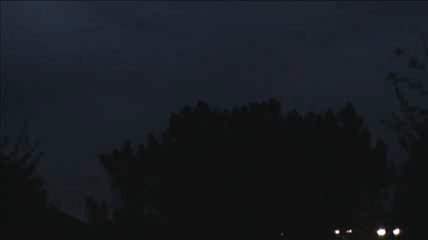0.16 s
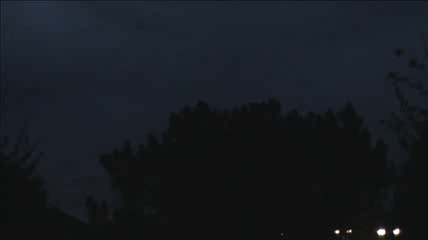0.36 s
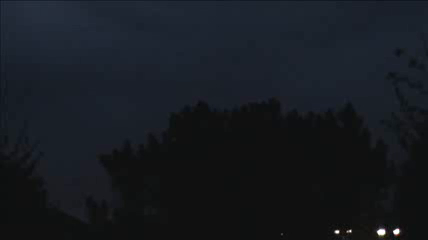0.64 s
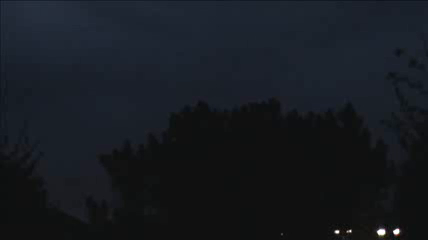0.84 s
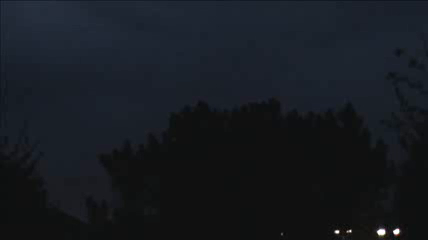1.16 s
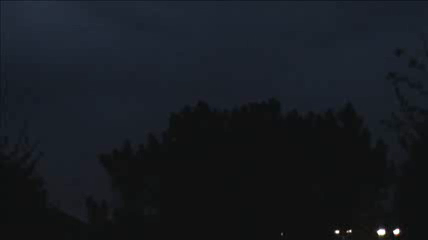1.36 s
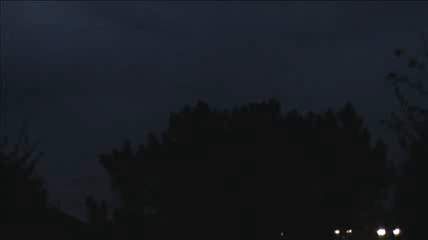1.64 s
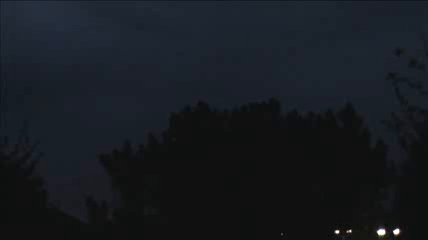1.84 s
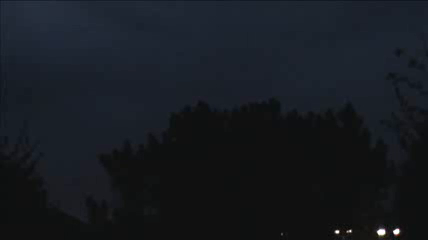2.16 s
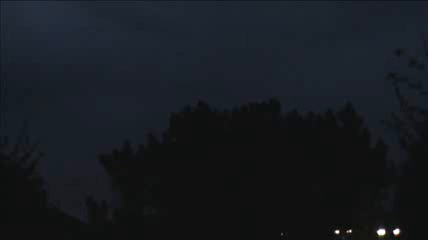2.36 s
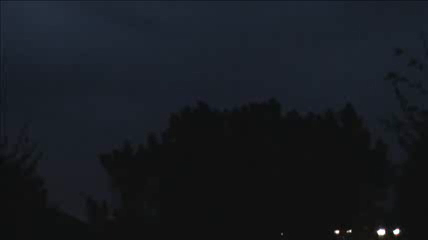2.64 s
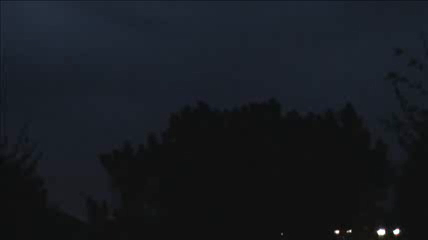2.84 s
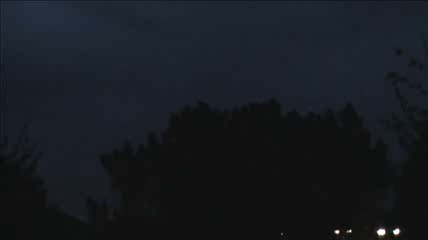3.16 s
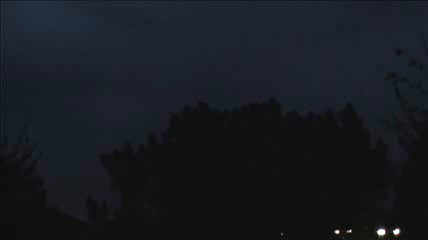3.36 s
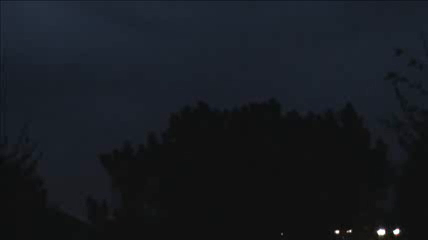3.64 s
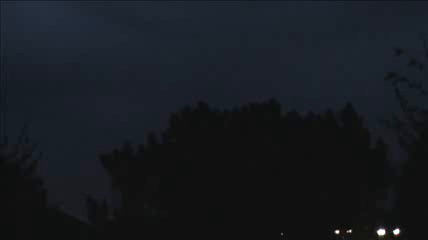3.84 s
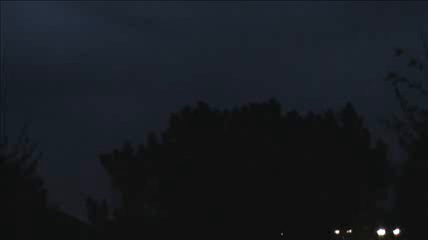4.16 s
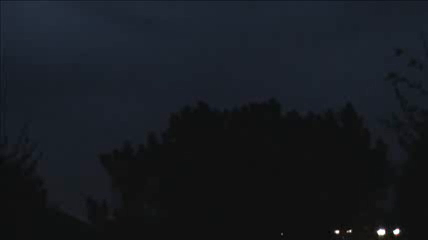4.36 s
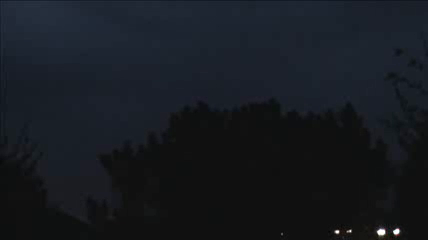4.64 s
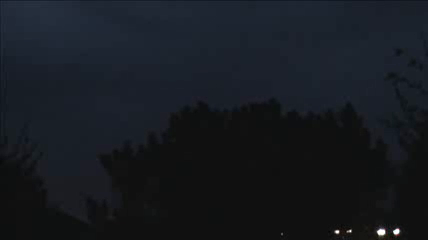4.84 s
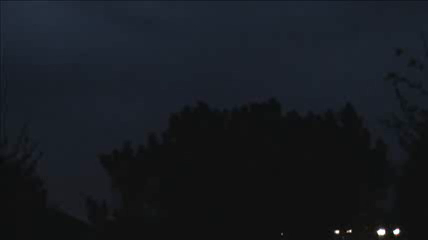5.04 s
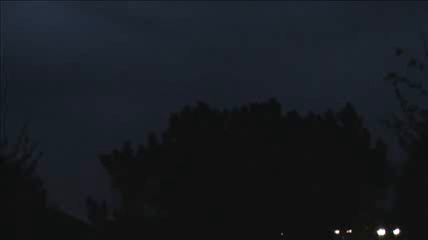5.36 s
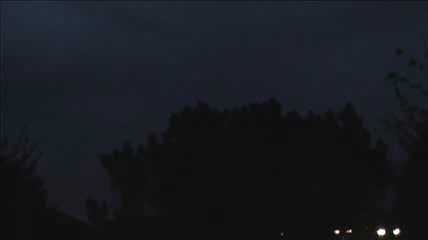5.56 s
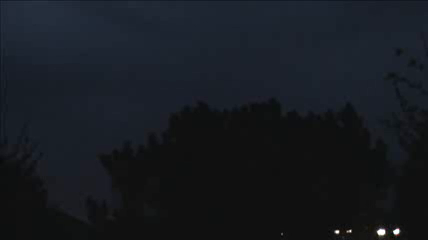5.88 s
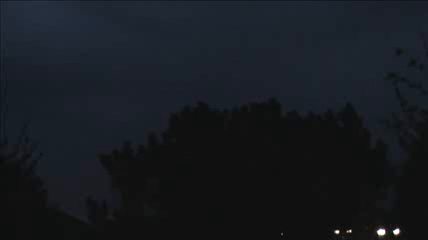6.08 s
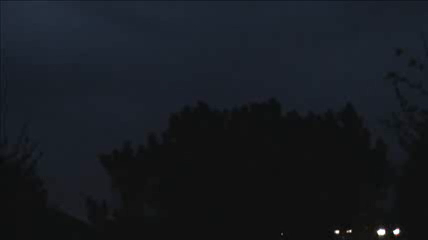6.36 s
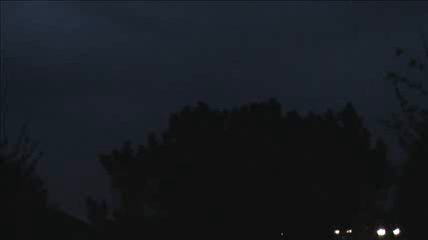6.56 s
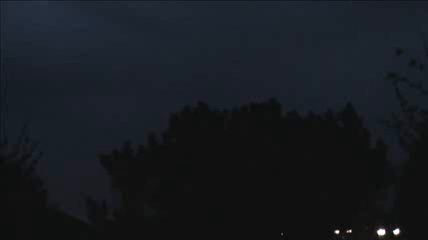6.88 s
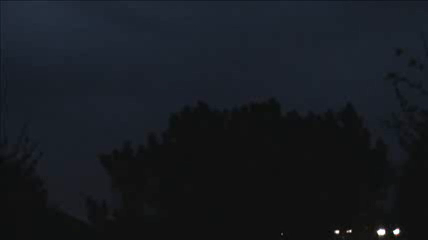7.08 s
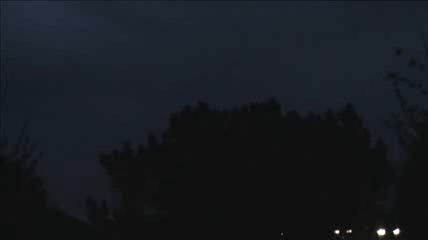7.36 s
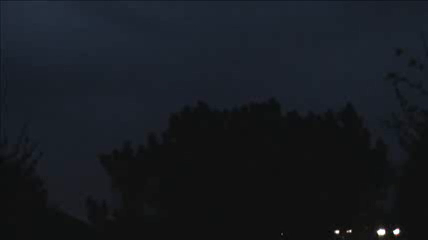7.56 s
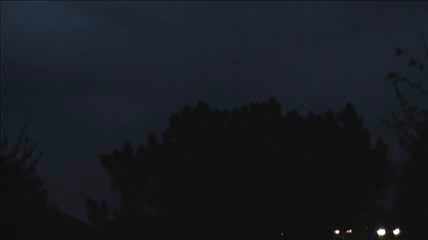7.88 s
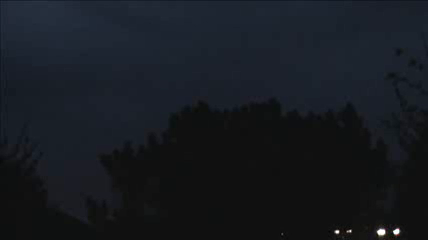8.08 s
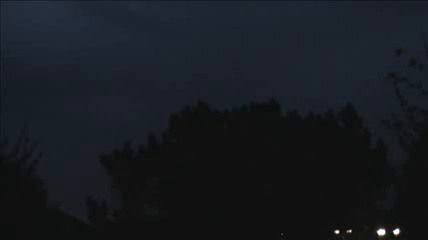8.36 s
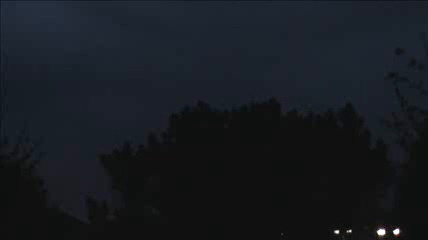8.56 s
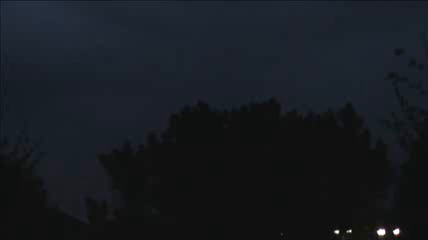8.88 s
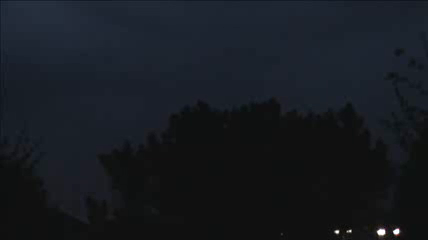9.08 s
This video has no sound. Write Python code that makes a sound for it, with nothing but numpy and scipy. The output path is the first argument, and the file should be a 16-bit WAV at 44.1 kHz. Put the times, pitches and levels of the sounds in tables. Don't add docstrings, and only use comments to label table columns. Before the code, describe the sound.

Rich, mellow blackbird whistles turn into thin, scratchy twitters, pause, then return, against a blurred far chorus of birds and quiet outdoor hiss.

```python
import sys
import numpy as np
from scipy import signal
from scipy.fft import rfft, irfft, next_fast_len
from scipy.io import wavfile
from scipy.ndimage import uniform_filter1d, map_coordinates

SR = 44100
rng = np.random.default_rng(int(sys.argv[2]) if len(sys.argv) > 2 else 0)


def materialize(psi):
    bounded = np.clip(np.atleast_2d(psi).T, -1, 1)
    quanta = np.round(bounded * 32767).astype(np.int16)
    wavfile.write(sys.argv[1], SR, quanta)


def gain_from_db(level_db):
    decades = np.asarray(level_db, float) / 20
    return 10 ** decades


N = 406161

STEADY = (0, 0, 0, 0, 0)
FAST_FLUTTER = 100
RAGGED = (75, 50, 0.33, .5, 1.5)


def blackbird():
    song = syrinx()
    bounce = np.array([np.pad(song, (round(lag_s * SR), 0))[:N] for lag_s in (.0056, .00562)])
    tail = gain_from_db(-14) * echoes(np.pad(song, (500, 0))[:N], stretch=0.76)
    direct_gain, bounce_gain = gain_from_db([[1.9], [-1.9]]), gain_from_db([[-2.5], [-6.5]])
    left, right = gain_from_db(-3.0) * (song * direct_gain + bounce * bounce_gain) + tail
    return np.array([left, coloured(right, [(2000, -.6), (4000, 1.0), (8000, 2.2)])])


# freq_hz, level_db (per Hz)
BREATH = [(500, -1.5), (1500, -0.5), (3200, 7.5), (4500, 1.5), (6000, 1.5), (8500, 4), (11000, 1.5),
          (15500, -3)]


def syrinx():
    lower, upper = np.zeros((2, N), complex)
    for phrase_part in (held_notes, shaped_notes, curls, twitters, buzzes, trills):
        phrase_part(lower, upper)
    both = lower + upper
    effort, strain = strength(both), strength(upper)
    rasp = gain_from_db(-30) * effort + gain_from_db(-25.5) * np.sqrt(effort * strain)
    breath = rasp * unit(coloured(rng.standard_normal(N), BREATH))
    return both.real + windpipe(lower, upper, effort, strain) + breath


# start_s, length_s, start_hz, end_hz, level_db
HELD_LOW = [
    (9.14, 0.026, 1930, 1780, -46),
    (7.78, 0.055, 1590, 1670, -52.5),
]
HELD_HIGH = [
    (2.275, 0.045, 2466, 2340, -53.5),
    (8.64, 0.077, 2382, 2224, -44),
    (8.716, 0.084, 2314, 2410, -55),
]
# start_s, length_s, crest_hz, end_hz, crest_level_db
ARCHES_HIGH = [
    (1.817, .18, 3360, 2910, -71),
    (2.041, 0.16, 3530, 3220, -76),
]


def held_notes(lower, upper):
    gliding, arching = (.95, .012, .2, 1.6, -50), (.67, .07, .5, 2.8, 18)
    for row in HELD_LOW:
        sing(lower, gesture(row, gliding), STEADY)
    for row in HELD_HIGH:
        sing(upper, gesture(row, gliding), RAGGED)
    for row in ARCHES_HIGH:
        sing(upper, gesture(row, arching), RAGGED)


# time_s, pitch_hz, level_db
LEAPS = [
    [(1.83, 1220, -63), (1.842, 1477, -53), (1.856, 1870, -41)],
    [(2.275, 1445, -63.5), (2.3, 1690, -46.5), (2.315, 1760, -44), (2.33, 2250, -42), (2.345, 2623, -36),
     (2.37, 2624, -37.5), (2.44, 2692, -42), (2.48, 2735, -50)],
    [(8.45, 2875, -60), (8.458, 2895, -37.5), (8.492, 2870, -43), (8.5, 2844, -29), (8.512, 2840, -35),
     (8.53, 2820, -28), (8.545, 2795, -29), (8.565, 2740, -37), (8.582, 2650, -33), (8.592, 2575, -42)],
]
FLUTED = [
    [(2.036, 2064, -51), (2.046, 2125, -40.5), (2.058, 2111, -37.5), (2.112, 2062, -36.5),
     (2.138, 2084, -35), (2.162, 2020, -39.5), (2.178, 2067, -48), (2.19, 1880, -50)],
    [(2.704, 1847, -64), (2.714, 1887, -39.5), (2.734, 1931, -43), (2.742, 1958, -42.5), (2.784, 1850, -35),
     (2.808, 1847, -37.5), (2.822, 1912, -40.5), (2.83, 1976, -49)],
    [(3.106, 2015, -45), (3.122, 2075, -35), (3.158, 2037, -38.5), (3.204, 1910, -38.5), (3.254, 1833, -36),
     (3.274, 1810, -49), (3.296, 1655, -37), (3.31, 1674, -47)],
    [(7.535, 1899, -49), (7.541, 1928, -46), (7.563, 1936, -46.5), (7.655, 1930, -43), (7.703, 1907, -43),
     (7.72, 1890, -56)],
    [(7.86, 1920, -48), (7.87, 2099, -41), (7.88, 2157, -37), (7.898, 2231, -35.5), (7.92, 2125, -36.5),
     (7.932, 2105, -39), (7.938, 2166, -40), (7.95, 2166, -32)],
    [(8.148, 1800, -50), (8.157, 1969, -43), (8.177, 2153, -32.5), (8.195, 2204, -35.5),
     (8.227, 2216, -33.5), (8.285, 2124, -35.5), (8.307, 2017, -40), (8.333, 1909, -47.5),
     (8.35, 1890, -41)],
    [(8.652, 1680, -54), (8.666, 1870, -35.5), (8.682, 1840, -34.5), (8.778, 1832, -37), (8.805, 1864, -50)],
    [(8.955, 2059, -49), (8.965, 2154, -33.5), (8.973, 2257, -41), (8.995, 2296, -32), (9.043, 2274, -35.5),
     (9.091, 2100, -36.5), (9.121, 2043, -35), (9.145, 1910, -46)],
]
SWEEPS = [
    [(7.778, 2666, -68), (7.795, 2800, -54), (7.82, 2870, -60), (7.85, 2730, -53), (7.865, 2730, -62)],
    [(7.778, 3120, -67), (7.8, 3280, -60), (7.822, 3336, -49.5), (7.84, 3200, -60)],
    [(7.858, 2900, -64), (7.868, 3900, -59), (7.876, 4400, -62)],
    [(8.44, 3090, -55), (8.452, 3250, -35.5), (8.465, 3481, -43), (8.49, 3240, -46)],
    [(3.092, 2200, -50), (3.1, 2450, -41), (3.108, 2700, -43), (3.14, 2984, -45.5), (3.206, 2737, -47),
     (3.28, 2548, -40.5), (3.322, 2337, -35.5), (3.34, 2070, -61)],
    [(3.42, 3017, -62), (3.435, 3300, -38), (3.455, 3600, -31.5), (3.476, 4260, -38), (3.482, 4400, -35)],
    [(3.538, 2965, -29), (3.55, 3118, -31.5), (3.565, 3400, -35), (3.585, 3780, -35.5),
     (3.605, 3966, -43.5), (3.625, 3380, -46.5)],
    [(3.75, 7470, -61), (3.77, 8070, -55.5), (3.787, 8220, -52), (3.795, 9020, -40.5), (3.802, 5670, -45),
     (3.812, 5900, -54), (3.828, 6350, -49)],
]
WAVER = (62, 21.4, 0.28, 0.506, 1.2)


def shaped_notes(lower, upper):
    for rows in LEAPS + FLUTED:
        sing(lower, rows, STEADY)
    for rows in SWEEPS:
        sing(upper, rows, WAVER)


# time_s, pitch_hz, level_db
CURLS = [
    [(2.692, 2077, -54), (2.715, 2450, -52), (2.745, 2770, -53), (2.757, 2760, -59), (2.772, 2684, -53),
     (2.8, 2500, -62), (2.83, 2420, -55)],
    [(8.136, 2233, -56), (8.152, 2420, -44), (8.166, 2520, -47), (8.178, 2700, -64), (8.2, 3026, -48.5),
     (8.25, 3177, -53), (8.3, 2950, -55), (8.33, 2600, -48), (8.35, 2250, -52)],
    [(8.931, 2152, -58), (8.95, 2400, -44), (8.97, 2650, -59), (8.99, 3006, -50.5), (9.025, 3190, -52),
     (9.09, 2960, -57), (9.14, 2590, -46), (9.168, 2200, -47)],
]


def curls(lower, upper):
    for rows in CURLS:
        sing(upper, rows, RAGGED)


# start_s, level_db
TWITTERS = [
    (4.331, -50.5),
    (4.394, -49),
]
TWITTER_RASP = (320, 90, 0.26, .4, 1)
# time_after_start_s, pitch_hz, level_db
TWITTER_STRANDS = [
    [(0, 2180, 8.5), (.004, 3700, -1), (.008, 5380, -0.5), (.027, 5900, -2), (.03, 7150, -10),
     (.05, 6700, -12)],
    [(.03, 3680, -5), (.06, 3650, -7)],
    [(.014, 3627, -9), (.029, 3645, 7), (.033, 4430, -1.5), (.041, 4460, -4), (.049, 3770, 2)],
]


def twitters(lower, upper):
    for start, db in TWITTERS:
        for strand in TWITTER_STRANDS:
            rows = [tuple(point) for point in np.add(strand, (start, 0, db))]
            sing(upper, rows, TWITTER_RASP)


# start_s, length_s, crest_hz, end_hz, level_db
BUZZES = [
    (7.463, 0.0795, 2090, 2000, -46.5),
    (7.939, 0.0953, 2150, 1940, -39),
    (7.468, 0.071, 2150, 2050, -54),
    (7.945, 0.0902, 2120, 1950, -45.5),
    (3.476, 0.035, 4150, 4000, -41.5),
    (3.482, 0.03, 7000, 6400, -50),
    (3.587, .04, 3500, 3200, -43.5),
    (7.833, 0.032, 2700, 2400, -54.5),
]
# rate_per_s, pitch_swing_hz, level_depth_0_1, unsteadiness_0_1, level_lag_rad
BUZZ_FLUTTER = [(47.1, 333, 0.24, .3, .2), (50.33, 264, 0.25, .35, 0.29), (230.7, 370, 0.4, .4, 1.4),
                (240, 330, 0.46, .4, 1.1), (308, 590, 0.46, .6, 1.4), (320, 1800, .5, 0.6, 1.5),
                (263, 380, .5, 0.54, 1), (200, 440, .5, 0.51, 1.3)]


def buzzes(lower, upper):
    trilling, shrill = (.86, .045, .25, 1.6, -60), (.97, .015, .15, 2.2, -190)
    for row, flutter in zip(BUZZES, BUZZ_FLUTTER):
        kind = shrill if row[2] > 4000 else trilling
        sing(upper if flutter[0] > FAST_FLUTTER else lower, gesture(row, kind), flutter)


# time_s, pitch_hz (mean), level_db
TRILLS = [
    [(2.825, 1900, -43), (2.845, 2080, -40), (2.87, 2215, -35.5), (2.9, 2276, -34.5), (3.0, 2226, -34),
     (3.03, 2154, -41.5)],
    [(3.82, 2600, -51), (3.845, 2780, -49), (3.87, 2880, -45), (3.9, 2950, -43), (3.925, 3000, -47),
     (3.945, 3150, -43), (3.99, 3180, -44), (4.005, 3000, -58)],
    [(3.805, 6720, -44), (3.83, 6880, -45), (3.87, 6700, -52.5), (3.92, 6590, -53), (3.96, 6640, -63),
     (4.0, 6600, -59)],
    [(4.042, 4970, -52), (4.06, 4970, -43.5), (4.1, 5060, -44.5), (4.15, 5055, -44), (4.19, 4950, -50),
     (4.22, 4863, -50), (4.28, 4910, -58)],
    [(4.041, 7750, -58), (4.06, 7880, -49), (4.15, 8010, -49.5), (4.25, 8000, -56), (4.275, 7970, -63)],
    [(3.478, 2360, -43), (3.5, 2600, -45.5), (3.52, 2843, -37.5), (3.54, 2950, -39)],
    [(3.845, 3780, -52), (3.87, 3600, -58), (3.9, 3580, -51), (3.93, 3450, -53), (3.99, 3400, -58)],
    [(1.852, 1900, -46), (1.87, 2090, -42.5), (1.91, 2120, -39), (1.95, 2087, -41.5), (1.97, 2030, -46.5),
     (2.0, 1960, -49)],
]
TRILL_FLUTTER = [(68.04, 167, 0.52, 0.019, -0.87), (185, 270, .6, 0.06, 1.47), (185, 170, 0.3, 0.25, 2.1),
                 (163, 120, 0.55, 0.2, 1.0), (163, 240, 0.3, .15, 2), (293, 260, 0.54, .22, 0.45),
                 (185, 170, .6, 0.12, 2), (54.5, 66, 0.43, .03, 0.8)]


def trills(lower, upper):
    for rows, flutter in zip(TRILLS, TRILL_FLUTTER):
        sing(upper if flutter[0] > FAST_FLUTTER else lower, rows, flutter)


# order, level_db
ORDER_DB = [(2, -28), (3, -46), (4, -38), (5, -42)]
# freq_hz, level_db
BEAK = [(3000, -9), (4800, -6), (5800, -8), (7000, -4), (8500, 12), (9700, 1), (11000, 1), (15000, -50)]
# freq_hz, level_db
PAIRING = [(3000, -20), (4800, -22.5), (6200, -22), (7400, -27), (9800, -19.5), (13000, -24), (15500, -50)]
CROSSINGS = [(3, 1), (1, 2), (2, 2), (4, 1), (0, 3)]
CROSS_DB = [-26, -22, -30, -30, -24]


def windpipe(lower, upper, effort, strain):
    both = lower + upper
    swing = both / np.maximum(effort, abs(both) / 2.0)
    harmonics = sum(gain_from_db(db) * swing ** order for order, db in ORDER_DB)
    forcing = (effort / gain_from_db(-38)) ** .3
    overtones = coloured(effort * forcing * harmonics, BEAK) / 2
    pairs = coloured(upper * swing, PAIRING) / 2
    low, high = lower / np.maximum(effort, abs(lower)), upper / np.maximum(strain, abs(upper))
    crossed = sum(gain_from_db(db) * low ** lows * high ** highs for (lows, highs), db in zip(CROSSINGS, CROSS_DB))
    return overtones + pairs + coloured(np.sqrt(strain * effort * abs(low)) * crossed, BEAK) / 2


def strength(z):
    return np.sqrt(abs(uniform_filter1d(abs(z) ** 2, size=441))) + 1e-7


def gesture(row, kind, count=25):
    s, length, crest_hz, end_hz, db = row
    scoop, climb_s, most, bend, strain_db = kind
    t, climb = np.linspace(0, length, count), min(climb_s, most * length) + 1e-6
    rise = 1 - (1 - scoop) * np.clip(1 - t / climb, 0, 1) ** 1.7
    glide = np.clip((t - climb) / (length - climb), 0, 1) ** bend
    hz = crest_hz * rise + (end_hz - crest_hz) * glide
    attack_s, release_s = min(0.019, 0.18 * length), min(0.0091, 0.18 * length)
    edge = np.clip(np.minimum(t / attack_s, (length - t) / release_s), 0, 1)
    level = db - 9 * (1 - edge) ** 2 + strain_db * np.log2(crest_hz / np.minimum(hz, crest_hz))
    return list(zip(s + t, hz, level))


def sing(track, rows, flutter):
    add(track, min(rows)[0], note(rows, flutter))


def note(rows, flutter=STEADY):
    s, hz, db = np.transpose(sorted(rows))
    rate, swing, depth, unsteady, lag = flutter
    t = np.arange(s[0], s[-1], 1 / SR)
    shake, sway, slip = wobble(69.8, len(t)), wobble(56.0, len(t)), wobble(69.5, len(t))
    beat = 2 * np.pi * np.cumsum(rate * (1 + unsteady * slip)) / SR
    path = uniform_filter1d(np.interp(t, s, hz), size=len(t) // 12, mode="nearest")
    pitch = path + 5.8 * shake + swing * np.sin(beat)
    level = gain_from_db(np.interp(t, s, db) + 5.5 + 1.07 * sway) * (1 + depth * np.sin(beat - lag))
    edges = np.clip(np.minimum(t - s[0], s[-1] - t) / .004, 0, 1)
    return edges * level * np.exp(2j * np.pi * np.cumsum(pitch) / SR)


# start_s, length_s, start_hz, end_hz, level_db
FAR_GLIDES = [(0, .19, 2050, 1994, -66), (.13, 0.22, 2155, 2060, -59), (.268, 0.2, 1965, 2060, -59.5),
              (.34, 0.14, 2250, 2750, -67), (.7, 0.2, 2160, 2110, -65), (0.509, 0.055, 2290, 2470, -59),
              (.57, 0.12, 2490, 2166, -60), (1.04, .04, 1780, 1860, -66), (1.098, 0.037, 1705, 1700, -68),
              (1.14, .07, 2150, 1950, -61.5), (1.376, 0.07, 1705, 1727, -62), (1.62, .065, 2380, 2300, -67),
              (1.63, .07, 2150, 1850, -65), (1.278, 0.074, 1520, 1650, -74), (1.33, .07, 2290, 1930, -61.5),
              (1.519, .065, 2140, 2104, -65), (1.695, 0.085, 1820, 1770, -58.5),
              (1.77, .075, 2120, 2040, -60), (3.96, 0.089, 2249, 2005, -56), (4.5, 0.07, 3050, 3210, -67),
              (4.57, .05, 2700, 2660, -65), (4.593, 0.11, 2330, 1997, -55.5),
              (4.896, 0.048, 2750, 3250, -66), (5.2, 0.12, 2174, 2176, -61.5),
              (5.589, 0.075, 2390, 2310, -61.5), (5.906, 0.11, 2050, 2163, -64.5),
              (7.01, 0.056, 1870, 1806, -64), (7.09, 0.04, 2030, 2180, -63), (7.14, .05, 2170, 2200, -62),
              (7.3, .07, 2270, 2300, -59), (7.33, .07, 2480, 2600, -66), (7.38, 0.1, 2100, 1950, -63),
              (7.2, .1, 2250, 2200, -67), (7.46, 0.099, 3190, 2970, -59), (8.35, 0.14, 2600, 2860, -56),
              (4.36, .09, 2080, 2110, -59), (8.598, .045, 2720, 2770, -49), (5.42, .13, 2200, 2260, -63),
              (1.09, .06, 2600, 2580, -69),
              (0, 0.076, 2610, 2644, -63.5), (5.82, 0.076, 1960, 2050, -67), (4.62, .04, 3200, 3240, -67),
            (4.65, 0.043, 2720, 2770, -64), (4.7, 0.096, 1990, 1974, -64.5), (4.8, .06, 2800, 2720, -64),
            (4.87, 0.12, 2120, 2260, -68), (4.97, 0.061, 2780, 2600, -68), (5.15, .05, 1950, 1950, -69),
            (5.37, .06, 2060, 2140, -62), (6.3, .05, 1870, 1930, -72), (6.52, 0.1, 2100, 2095, -66.5),
            (6.89, .06, 1640, 1620, -71), (8.718, 0.055, 3054, 3073, -54.5), (1.5, .4, 3050, 3150, -82),
            (6.93, .14, 2730, 2740, -74), (7.07, .1, 2740, 2480, -72), (0, .05, 1830, 1780, -66),
            (.38, .18, 2780, 2760, -72), (.2, .1, 2520, 2400, -68), (7.75, .045, 4650, 4620, -68),
            (7.72, .02, 4200, 4650, -67)]
# start_s, length_s, crest_hz, end_hz, level_db
FAR_ARCHES = [
    (1.05, 0.1, 2260, 2180, -64.5),
    (4.43, 0.25, 2370, 2300, -59.5),
    (5.412, 0.11, 2387, 2444, -59),
    (6.088, 0.09, 3100, 2720, -71),
    (6.18, 0.058, 3170, 3180, -68.5),
    (6.265, 0.07, 3200, 2850, -69.5),
    (6.728, .19, 2410, 2270, -66.5),
    (6.74, 0.19, 2640, 2690, -69),
    (7.647, 0.064, 2690, 2580, -64),
]


def neighbours():
    calls = np.zeros(N)
    for s, length, start_hz, end_hz, db in FAR_GLIDES:
        add(calls, s, whistle(length, [start_hz, (start_hz + end_hz) / 2, end_hz], db))
    for s, length, crest_hz, end_hz, db in FAR_ARCHES:
        add(calls, s, whistle(length, [0.84 * crest_hz, crest_hz, end_hz], db))
    return calls * gain_from_db([[-1.2], [-.2]]) + gain_from_db(-5.5) * echoes(calls, stretch=1.1)


def whistle(length, hz, db):
    u = np.arange(round(length * SR)) / (length * SR)
    bend = np.polyval(np.polyfit([0, .5, 1], hz, 2), u)
    pitch = bend * (1 + .007 * wobble(70, len(u)))
    level = gain_from_db(db - 1 + 3.4 * wobble(45, len(u))) * np.sin(np.pi * u) ** .15
    return level * np.sin(2 * np.pi * np.cumsum(pitch) / SR)


# time_s, level_db
CHORUS = [(0, -56.5), (1, -72), (2.5, -62.5), (4.44, -60.5), (5.5, -65.5), (6.1, -76), (6.6, -77.5),
          (7.4, -63), (9.21, -56)]


def chorus(count=800):
    calls, times = np.zeros(N), rng.uniform(0, N / SR, count)
    for s, (long, base, bend, end, loud) in zip(times, rng.standard_normal((count, 5))):
        hz = 2250 * np.exp(0.15 * base + 0.0411 * np.array([0, bend, bend + end]))
        add(calls, s, whistle(0.0486 * np.exp(0.29 * long), hz, loud))
    return gain_from_db(curve(CHORUS)) * unit(.25 * calls + echoes(calls, stretch=2.2))


# time_s, level_db
RUMBLE = [(0, -74), (3.6, -72), (5.3, -76), (7.5, -78), (9.21, -71)]


def traffic():
    spectrum = [(15, -32), (30, -25), (55, 4.5), (90, -4.5), (125, -1.5), (200, -18.5), (400, -56)]
    return gain_from_db(curve(RUMBLE) + 1.0) * unit(coloured(rng.standard_normal(N), spectrum))


# freq_hz, level_db (per Hz)
AIR = [(15, -31), (30, -7), (55, 2), (90, -22.5), (125, -6), (250, -2.5), (372, -4), (520, -1), (834, -6.5),
       (1410, -7), (2200, -4), (3640, -10.5), (9930, -14), (15500, -15.5)]
# freq_hz, likeness_0_1
ALIKE = [(60, 0.9), (180, 0.77), (550, 0.01), (1650, 0.045), (4970, 0.52), (15000, 1)]
# time_s, level_db
HISS = [(0, -1.5), (4.3, 2.5), (5.5, -1.5), (9.21, 0.2)]


def air():
    m = next_fast_len(N)
    hz = np.fft.rfftfreq(m, 1 / SR)
    turn = np.arccos(np.clip(along(ALIKE, hz), -1, 1)) / 2
    shape = gain_from_db(along(AIR, hz)) * [np.cos(turn), np.sin(turn)]
    mid, side = irfft(rfft(rng.standard_normal((2, m))) * shape, m)[:, :N]
    return gain_from_db(-63 + curve(HISS)) * unit(np.array([mid + side, mid - side]))


# freq_hz, level_db (per Hz)
LEAVES = [(4000, -30), (8000, 2), (11000, -2), (15500, -7)]


def rustle():
    start_s, length_s, level_db = 5.95, 0.79, -73
    t = np.arange(N) / SR - start_s
    swell = np.clip(np.minimum(t, length_s - t) / .05, 0, 1)
    return gain_from_db(level_db) * swell * unit(coloured(rng.standard_normal(N), LEAVES))


# time_s, pitch_hz, level_db
DRONES = [
    [(0, 123, -83), (1.2, 124, -80.5), (2.7, 125, -82), (3.4, 125, -92)],
    [(0, 505, -83), (.5, 515, -86), (1.2, 545, -87), (2.6, 555, -88)],
]


def motor():
    drone = np.zeros(N)
    for rows in DRONES:
        add(drone, rows[0][0], note(rows).real)
    return drone


# freq_hz, t60_s
TREES = [(1000, 0.76), (3000, 0.37), (8000, 0.15)]


def echoes(x, stretch):
    hz, t, z = signal.stft(rng.standard_normal((2, SR)), SR, nperseg=256)
    decay = gain_from_db(-60 * t / (stretch * along(TREES, hz))[:, None])
    tail = signal.istft(z * decay, SR, nperseg=256)[1]
    return signal.fftconvolve(np.atleast_2d(x), tail / np.linalg.norm(tail[0]), axes=1)[:, :N]


def coloured(x, points):
    m = next_fast_len(N)
    gain = gain_from_db(along(points, np.fft.rfftfreq(m, 1 / SR)))
    return irfft(np.fft.fft(x, m)[..., :m // 2 + 1] * gain, m)[..., :N]


def along(points, hz):
    f, v = np.transpose(points)
    return np.interp(np.log(hz + 1), np.log(f + 1), v)


def curve(points):
    return np.interp(np.arange(N) / SR, *np.transpose(points))


def wobble(rate, size, most=64):
    return map_coordinates(rng.standard_normal(most), [np.arange(size) * rate / SR], mode="wrap")


def unit(x):
    return x / np.sqrt(np.mean(x ** 2) + 1e-20)


def add(track, s, x):
    part = track[round(s * SR):][:len(x)]
    part += x[:len(part)]


def scene():
    return blackbird() + neighbours() + chorus() + traffic() + air() + rustle() + motor()


def top_cut(x):
    return signal.sosfilt(signal.butter(12, 15490, fs=SR, output="sos"), x)


def record(dry):
    sensor, stored, blocks = 160, 147, 2800
    sensed = irfft(rfft(dry, stored * blocks), sensor * blocks) * sensor / stored
    kept = sensed[:, np.arange(N) * sensor // stored]
    return top_cut(kept)


dry = scene()
out = record(dry)
materialize(out)
```